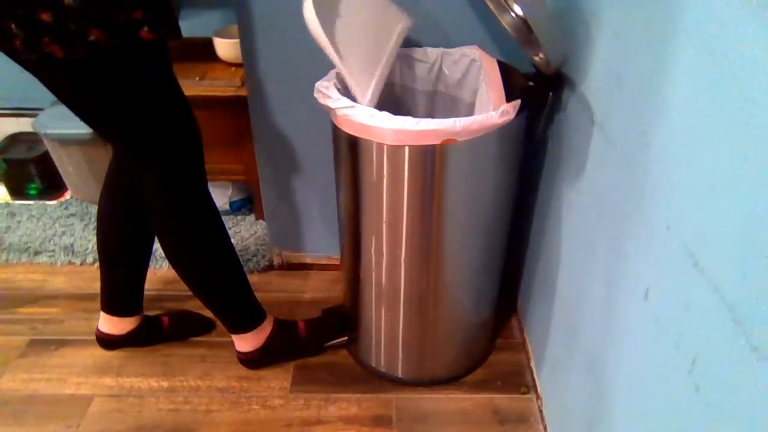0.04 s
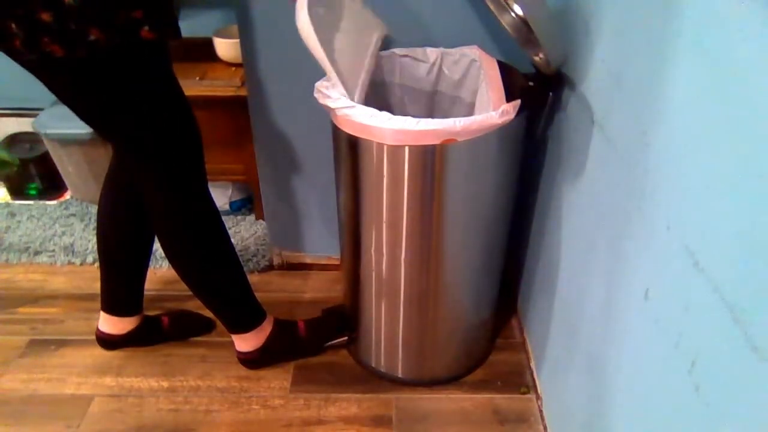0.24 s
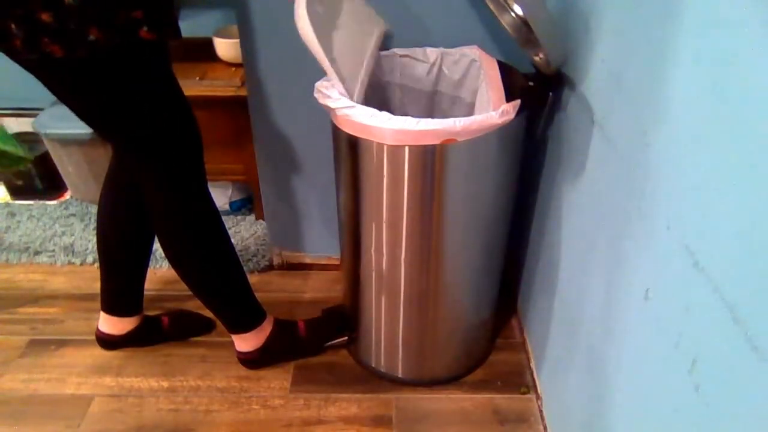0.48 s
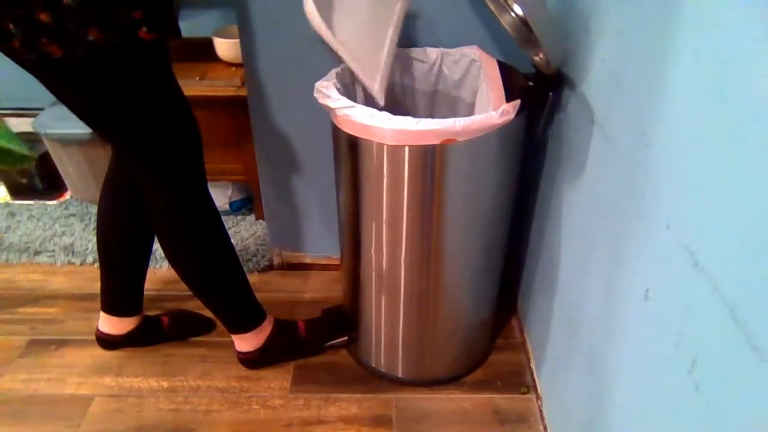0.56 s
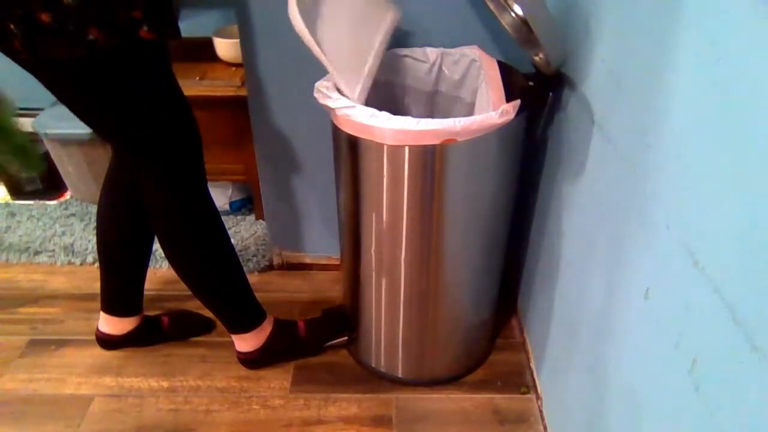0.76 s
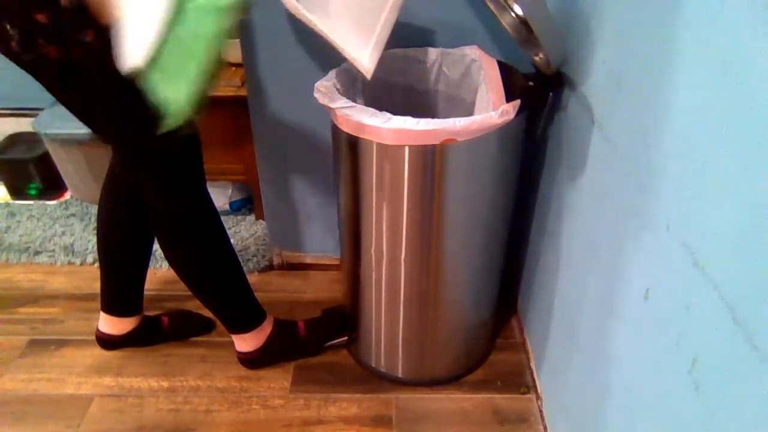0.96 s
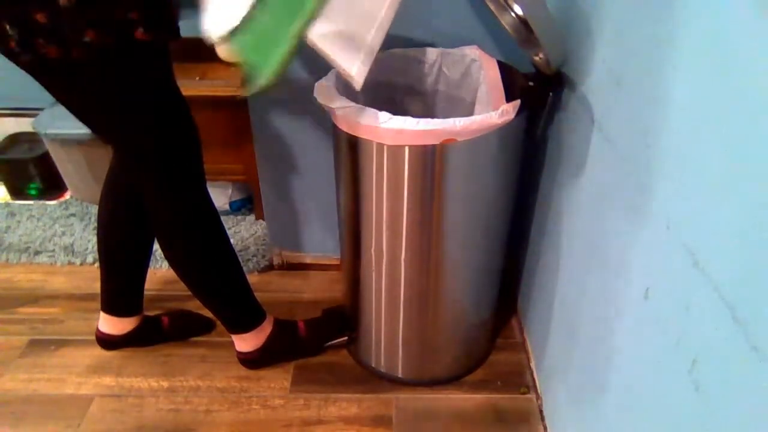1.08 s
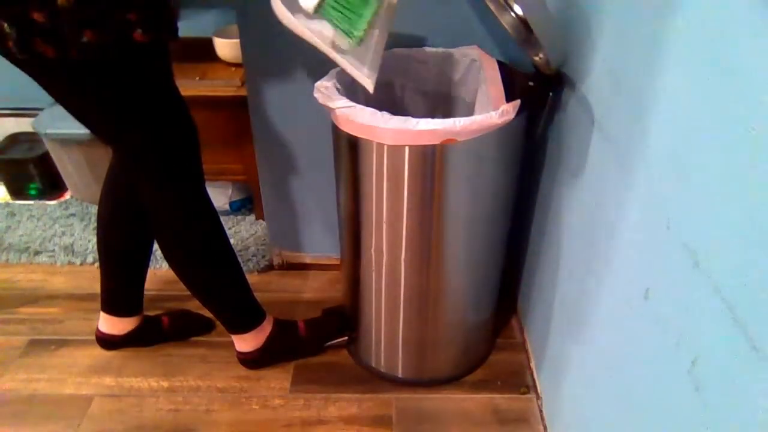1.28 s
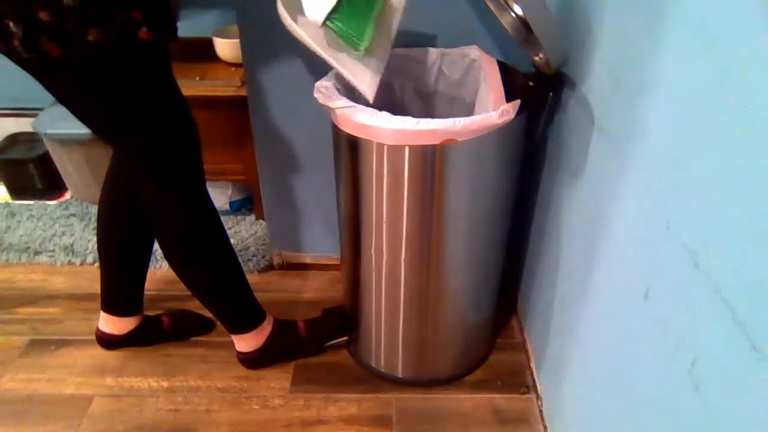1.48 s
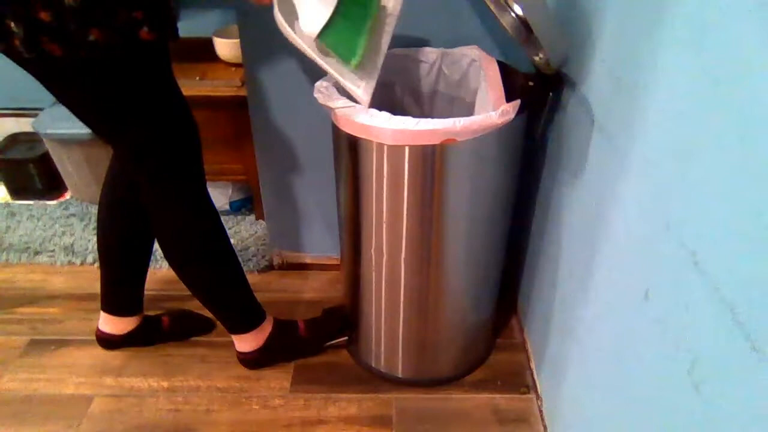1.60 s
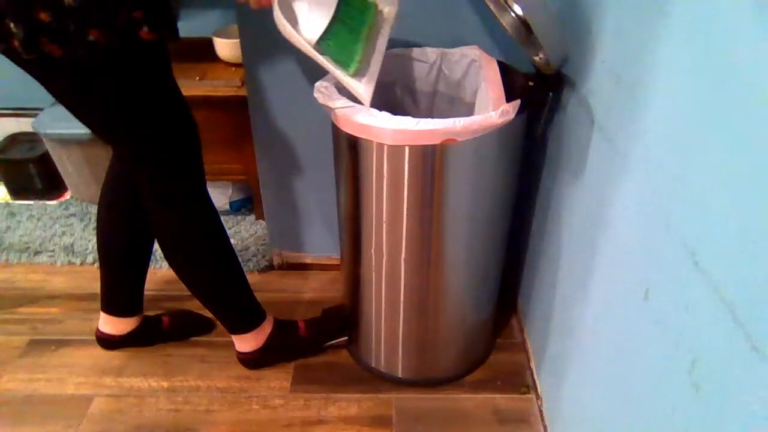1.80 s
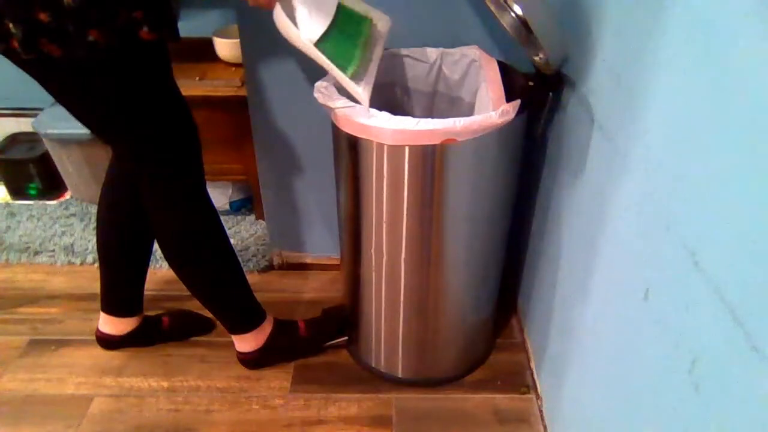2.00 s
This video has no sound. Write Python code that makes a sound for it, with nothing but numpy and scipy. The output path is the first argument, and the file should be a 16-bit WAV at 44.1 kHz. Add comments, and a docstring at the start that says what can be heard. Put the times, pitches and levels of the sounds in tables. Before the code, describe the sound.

Three sharp dustpan taps on a metal bin's rim, followed by faint clicks and liner crinkles.

```python
"""An appliance hums and a bin liner rustles faintly in a small live room. A plastic dustpan is
rapped three times on the rim of the steel kitchen bin: each rap cracks, shakes the pan, leaves
the bin ringing and just overloads the microphone. Then a hand brush knocks lightly in the pan
and the liner crinkles, among soft swishes and two faint, thin whistles."""
import sys
import numpy as np
from scipy import signal
from scipy.fft import rfft, irfft, next_fast_len
from scipy.io import wavfile
from scipy.ndimage import uniform_filter1d, map_coordinates

SR = 44100
rng = np.random.default_rng(int(sys.argv[2]) if len(sys.argv) > 2 else 0)


def persist_wave(psi):
    """Save psi, clipped to +-1, as 16-bit WAV."""
    counts = np.round(np.clip(psi, -1, 1) * 32767).astype(np.int16)
    wavfile.write(sys.argv[1], SR, np.atleast_2d(counts).T)


N = 90404
T = np.arange(SR * 3 // 2) / SR  # time within one event, s
SCENE_T = np.arange(N) / SR
TOP_HZ, CRACK_DB, CRACK_RISE_S = 16050, -8, 0.00053
PAN_SPREAD_RAD, BIN_SPREAD_RAD = 0.12, 0.45  # +/- phase per channel at 700 Hz

# contact crack spectrum: freq_hz, density_db
CRACK_SPECTRUM = [(80, -14), (300, -4), (1100, -11.5), (1900, -11), (3200, -4.5), (4500, -7), (5800, -11.5),
                  (7300, -9), (10000, -18.5), (15500, -25)]


def amp(db):
    """Decibels to gain."""
    return 10 ** (np.asarray(db) / 20)


def unit(x):
    """Scale to rms 1."""
    return x / np.sqrt(np.mean(x ** 2) + 1e-20)


def along(points, hz):
    """Interpolate (freq_hz, value) points on a log axis."""
    freqs_hz, values = np.transpose(points)
    return np.interp(np.log(hz + 1), np.log(freqs_hz + 1), values)


def fade(t60_s):
    """Exponential decay."""
    return np.exp(-np.log(1000) * T / t60_s)


def rise(rise_s):
    """Smooth onset."""
    return 1 - np.exp(-(T / rise_s) ** 2)


def hump(x, sigma):
    """Gaussian of height 1."""
    return np.exp(-(x / sigma) ** 2 / 2)


def wobble(rate_hz):
    """Smooth random drift."""
    return map_coordinates(rng.standard_normal(100), [SCENE_T * rate_hz], mode="mirror")


def add(track, start_s, sound):
    """Mix in one event."""
    i = max(round(start_s * SR), 0)
    track[:, i:i + len(T)] += sound[:, :N - i]


def noise(spectrum, lean=1, coherence=None, size=len(T)):
    """Coloured stereo noise, rms 1; lean shifts mids left and treble right."""
    # default left-right likeness: freq_hz, correlation
    default_coherence = [(150, 0.94), (350, 1), (700, 0.71), (1400, 0.11), (4000, 0.036), (12000, 0.17)]
    # stereo balance: freq_hz, left_minus_right_db
    balance = [(200, -2), (700, 2.5), (1400, 2.5), (2800, -4), (5500, -8), (13000, -10)]
    hz = np.fft.rfftfreq(size, 1 / SR)
    width_rad = np.arccos(np.clip(along(coherence or default_coherence, hz), -1, 1)) / 2
    mid, side = rfft(rng.standard_normal((2, size))) * [np.cos(width_rad), np.sin(width_rad)]
    tilt_db = lean * along(balance, hz) / 2
    gain = amp(along(spectrum, hz) + np.array([tilt_db, -tilt_db]))
    return unit(irfft(np.array([mid + side, mid - side]) * gain, size))


def hum():
    """Appliance tones, each wavering in level and phase."""
    # hum partials: pitch_hz, level_db
    partials = [(59.2, -48), (91.5, -56), (209.9, -53.5), (296, -54), (355.6, -44), (491, -56)]
    out = np.zeros(N)
    for hz, db in partials:
        peak = np.sqrt(2) * amp(db + 3 * wobble(rate_hz=5.1))
        out += peak * np.sin(2 * np.pi * hz * SCENE_T + 0.46 * wobble(rate_hz=4.07))
    return out


def air():
    """Steady room noise, mostly bass."""
    # air spectrum: freq_hz, density_db
    spectrum = [(25, -8), (60, -16), (140, -19), (230, -16.5), (370, -14), (430, -26), (550, -24.5),
                (1000, -29.5), (1650, -31.5), (1900, -36), (4500, -43), (10000, -42.5), (15500, -44.5)]
    # left-right likeness: freq_hz, correlation
    coherence = [(60, 0.91), (400, 0.84), (1500, 0.093), (8000, 0.3)]
    return amp(-43) * noise(spectrum, lean=0, coherence=coherence, size=N)


def crinkles():
    """The liner's thin film snaps in small grainy bursts."""
    # film snaps: start_s, level_db, rise_s, t60_s
    snaps = [(0.02, -39, 0.0023, 0.16), (1.606, -23.5, 0.0016, 0.024), (1.957, -19.5, 0.002, 0.02),
             (1.979, -21, 0.0011, 0.018), (1.985, -20.5, 0.0012, 0.02), (1.989, -31, .001, .025)]
    # film spectrum: freq_hz, density_db
    film = [(300, -5), (3500, -1.5), (4600, 5), (5700, -4), (7000, 4), (9000, -2), (12000, -3), (15000, 2)]
    out = np.zeros((2, N))
    for start_s, db, rise_s, t60_s in snaps:
        grain_db = 0.98 * unit(uniform_filter1d(rng.standard_normal(len(T)), size=30))
        snap = noise(film, lean=1.03) * unit(amp(grain_db)) * fade(t60_s) * rise(rise_s)
        add(out, start_s, amp(db) * (snap + amp(-21) * room(film)))
    return out


def room(spectrum, late_db=-27, late_stretch=3.56):
    """Diffuse echo of a short sound; treble dies first, a weak part lingers."""
    # room decay: freq_hz, t60_s
    reverb_times = [(100, 0.77), (260, 0.64), (700, 0.56), (1800, 0.5), (4800, .35), (8000, 0.27),
                    (13000, 0.25)]
    hz, t, frames = signal.stft(noise(spectrum, lean=0.78), SR, nperseg=512)
    decay = np.log(1000) * t / along(reverb_times, hz)[:, None]
    envelope = np.hypot(np.exp(-decay), amp(late_db) * np.exp(-decay / late_stretch))
    _, tail = signal.istft(frames * envelope, SR)
    return tail[:, :len(T)] * rise(0.0043)


def burst(spectrum, rise_s, t60_s, lean=1):
    """Short contact noise, equalised to keep the colour of its spectrum."""
    def colour(x):
        power = uniform_filter1d(np.abs(rfft(x)) ** 2, size=180)
        return np.sqrt(np.abs(power) + 1e-12)

    source = noise(spectrum, lean)
    envelope = fade(t60_s) * rise(rise_s)
    puff = source * envelope
    even = irfft(rfft(puff) * colour(source) / colour(puff), len(T))
    even *= rise(rise_s) * np.exp(-(T / t60_s) ** 2)  # trim the equaliser's smear
    return unit(even) * np.sqrt(np.mean(envelope ** 2))


def impact():
    """Noise of one blow: crack with the pan's lip snapping back, thud, echo."""
    # lip snap spectrum: freq_hz, density_db
    lip_spectrum = [(700, -27), (1300, 5), (2000, 14), (2350, 1), (2700, 1), (3100, -18), (4000, -16),
                    (15000, -24)]
    # thud spectrum: freq_hz, density_db
    thud_spectrum = [(50, -28), (130, -6), (250, -2.5), (400, -0.5), (590, 3), (760, 2), (950, -2.5),
                     (1400, -6), (4000, -30.5)]
    # rap echo spectrum: freq_hz, density_db
    echo_spectrum = [(40, -38), (110, -10), (250, -7.5), (550, -5), (1000, -5), (1300, -11), (3000, -17),
                     (4800, -19.5), (5800, -25.5), (7300, -21), (10000, -30.5), (15500, -36)]
    crack = amp(CRACK_DB) * burst(CRACK_SPECTRUM, CRACK_RISE_S, t60_s=0.046)
    snap = amp(-7) * burst(lip_spectrum, rise_s=0.00075, t60_s=0.029, lean=3.4)
    thud = amp(-2.5) * burst(thud_spectrum, rise_s=0.0031, t60_s=0.063)
    return np.array([crack + snap, thud, amp(-13) * room(echo_spectrum)])


def draw_phases(modes):
    """Per mode: phase_rad, side (its sign picks the leading channel)."""
    return rng.uniform(-np.pi, np.pi, (len(modes), 2))


def ring(modes, spread_rad, phases, rise_cycles=3.24, max_rise_s=0.0041, scatter_db=2.5):
    """Damped modes that build up briefly; their levels vary from blow to blow."""
    out = np.zeros((2, len(T)))
    for (hz, db, t60_s), (phase, side) in zip(modes, phases):
        swell = 1 - np.exp(-(T / min(rise_cycles / hz, max_rise_s)) ** 4)
        offset_rad = np.array([[1], [-1]]) * np.sign(side) * min(spread_rad * hz / 700, np.pi / 3)
        gain = amp(db + scatter_db * rng.standard_normal())
        out += gain * swell * fade(t60_s) * np.sin(2 * np.pi * hz * T + phase + offset_rad)
    return out


def raps(fresh_share=0.092):
    """The pan hits one spot on the rim, so the blows sound alike; it bounces after the last."""
    # raps on the rim: start_s, level_db, crack_db, bin_ring_db
    blows = [(.2135, -1, -1.5, 0), (0.4426, 0, -2.5, -0.5), (0.6764, 2, -1, 0)]
    # pan bounces: start_s, crack_db, pan_ring_db
    bounces = [(0.6838, -6.5, -26), (.6900, -25, -25.5), (.6990, -8, -11.5), (0.7071, -6, -21.5)]
    # plastic dustpan modes: pitch_hz, level_db, t60_s
    pan_modes = [(153.5, -17, 0.22), (318, -14, 0.058), (385.3, -18, 0.2), (556, -7, 0.12),
                 (637, -11.5, 0.024), (714, -2.5, 0.061), (811, -8.5, 0.056), (1024, -16, 0.073),
                 (1260, -13, 0.042), (1487, -17.5, 0.06), (1750, -14, 0.079), (1957, -10, 0.053),
                 (2613, -13, 0.033), (2772, -11.5, 0.031)]
    # steel bin modes: pitch_hz, level_db, t60_s
    bin_modes = [(108.4, -37.5, 1), (141.76, -35, 1.9), (200.3, -26, 0.32), (293.8, -33, 0.88),
                 (338.9, -24, 0.64), (362.2, -25, 0.54), (430, -17, 0.3), (487.3, -19, 0.65),
                 (567.3, -17.5, 0.4), (664, -27.5, 0.52), (715, -24.5, 0.45), (836, -28, 0.34),
                 (867, -31.5, 0.43), (1000.6, -24.5, 0.68), (1117, -30, 0.47)]
    out = np.zeros((2, N))
    common = impact()
    pan_phases, bin_phases = draw_phases(pan_modes), draw_phases(bin_modes)
    pan_phases[:, 0] = np.pi * np.arange(len(pan_modes))  # one push, neighbouring modes opposed
    for start_s, db, crack_db, bin_db in blows:
        crack, thud, echo = np.sqrt(1 - fresh_share) * common + np.sqrt(fresh_share) * impact()
        plastic = ring(pan_modes, PAN_SPREAD_RAD, pan_phases)
        # the heavier bin builds up more slowly
        steel = ring(bin_modes, BIN_SPREAD_RAD, bin_phases, rise_cycles=3.5, max_rise_s=0.0074)
        rap = amp(crack_db) * crack + thud + echo + plastic + amp(bin_db) * steel
        add(out, start_s, amp(db) * rap)
    for start_s, crack_db, pan_db in bounces:
        crack = amp(CRACK_DB + crack_db) * burst(CRACK_SPECTRUM, CRACK_RISE_S, t60_s=0.015)
        add(out, start_s, crack + amp(pan_db) * ring(pan_modes, PAN_SPREAD_RAD, pan_phases))
    return out


def swishes():
    """Bristles and film swish softly."""
    # strokes: centre_s, level_db, sigma_s, peak_hz
    strokes = [(0.944, -55, 0.12, 11000), (1.692, -35, 0.011, 2520)]
    out = np.zeros((2, N))
    for centre_s, db, sigma_s, hz in strokes:
        spectrum = [(hz / 6, -20), (hz / 2, -2), (hz, 0), (hz * 4, -16)]
        out += amp(db) * hump(SCENE_T - centre_s, sigma_s) * noise(spectrum, size=N)
    return out


def whistles():
    """Faint, thin tones come and go."""
    # whistles: centre_s, sigma_s, pitch_hz, level_db
    tones = [(1.293, 0.042, 1577, -55.5), (1.515, 0.048, 1316, -52)]
    out = np.zeros(N)
    for centre_s, sigma_s, hz, db in tones:
        tone = np.sin(2 * np.pi * hz * SCENE_T + wobble(rate_hz=39.4))
        out += amp(db) * hump(SCENE_T - centre_s, sigma_s) * tone
    return out


def knocks():
    """Brush on pan, plastic on plastic: a short tock with a click on top; the brush rings."""
    # knocks: start_s, level_db, pitch_hz, sigma_octaves, floor_db, t60_s, room_db, brush_db, tock_db
    contacts = [(1.5490, -12.5, 1190, 0.35, -22, 0.018, -15, -13.5, 3.5),
                (1.6879, -19, 1410, 0.8, -14, 0.018, -27, -9.5, -1.5),
                (1.6973, -14, 1630, 0.15, -6, 0.019, -15, -15, 1)]
    # broadband floor of the click: freq_hz, density_db
    click_floor = [(60, -25), (170, 8.5), (400, 10.5), (4500, 4.5), (7000, -9), (15500, -18.5)]
    # hand brush modes: pitch_hz, level_db, t60_s
    brush_modes = [(1158, -6.5, 0.13), (1350, 3, 0.08), (1700, -3, 0.054), (2100, -6, 0.04)]
    out = np.zeros((2, N))
    hz = np.geomspace(30, TOP_HZ, 60)
    for start_s, db, pitch_hz, sigma_octaves, floor_db, t60_s, room_db, brush_db, tock_db in contacts:
        resonance = hump(np.log2(hz / pitch_hz), sigma_octaves)
        floor = amp(floor_db + along(click_floor, hz))
        spectrum = np.c_[hz, 20 * np.log10(resonance + floor)]
        brush = amp(brush_db) * ring(brush_modes, PAN_SPREAD_RAD, draw_phases(brush_modes))
        tock = amp(tock_db) * fade(t60_s=0.01) * np.sin(2 * np.pi * pitch_hz * T)
        click = burst(spectrum, rise_s=0.00027, t60_s=t60_s)
        add(out, start_s, amp(db) * (tock + click + amp(room_db) * room(spectrum) + brush))
    return out


def after_rings():
    """A hollow ring follows the small contacts."""
    # contacts: start_s, level_db
    nudges = [(1.551, -26), (1.607, -31), (1.717, -30)]
    # hollow modes: pitch_hz, level_db, t60_s
    modes = [(162.6, 0, 0.16), (246.4, -3, 0.19), (584, 5.5, 0.081), (856, -8, 0.2), (937, -7, 0.15),
             (1052, -5, 0.1)]
    out = np.zeros((2, N))
    for start_s, db in nudges:
        add(out, start_s, amp(db) * ring(modes, BIN_SPREAD_RAD, draw_phases(modes)))
    return out


def scene():
    """The bin is nearer the right microphone, so its sounds lag on the left; background unshifted."""
    at_bin = raps() + knocks() + after_rings() + crinkles() + swishes()
    size = next_fast_len(N + SR // 2)
    lag_s = np.array([[15e-6], [0]])
    delay = np.exp(-2j * np.pi * np.fft.rfftfreq(size, 1 / SR) * lag_s)
    at_mics = irfft(rfft(at_bin, size) * delay, size)[:, :N]
    return at_mics + hum() + whistles() + air()


def record(dry):
    """The microphone rounds off the highest peaks and cuts above its band limit."""
    clipped = dry / (1 + np.abs(dry) ** 8) ** (1 / 8)
    size = next_fast_len(N + SR // 2)
    lowpass = 1 / (1 + (np.fft.rfftfreq(size, 1 / SR) / TOP_HZ) ** 160)
    return irfft(rfft(clipped, size) * lowpass, size)[:, :N]


dry = scene()
out = record(dry)
persist_wave(out)
```